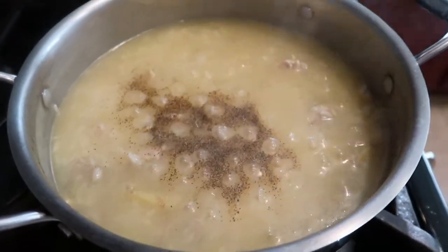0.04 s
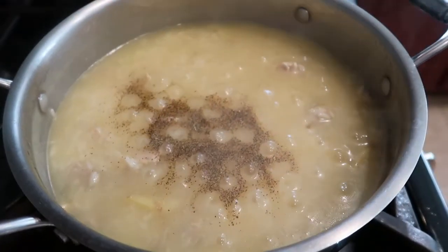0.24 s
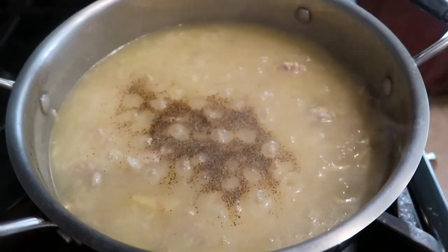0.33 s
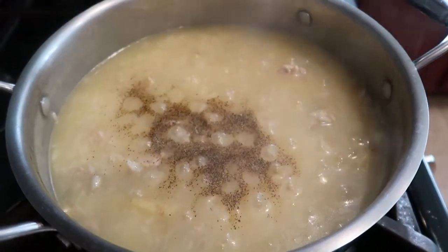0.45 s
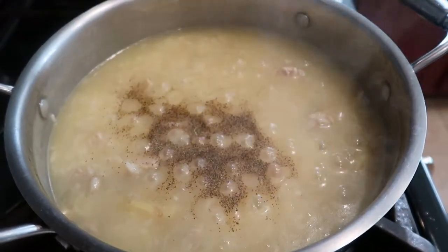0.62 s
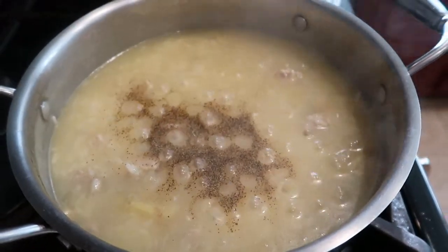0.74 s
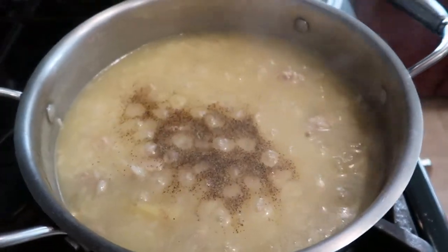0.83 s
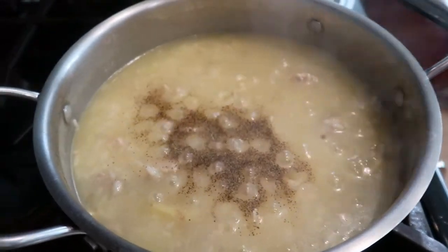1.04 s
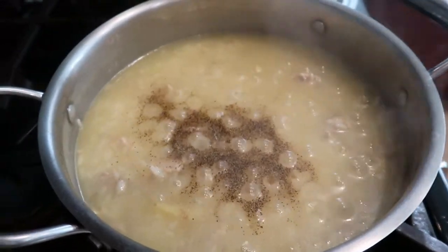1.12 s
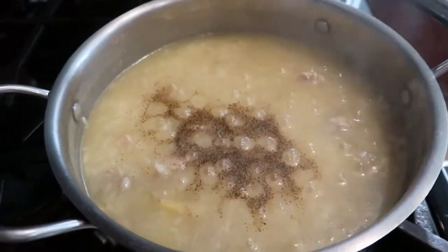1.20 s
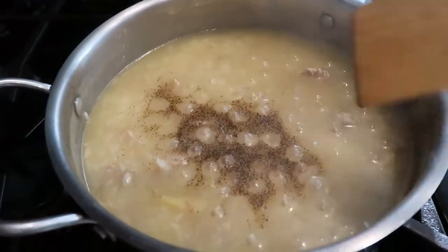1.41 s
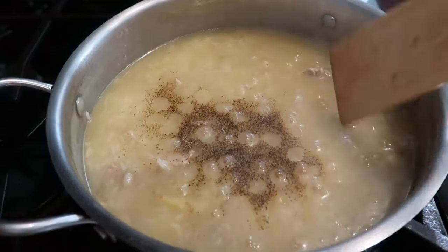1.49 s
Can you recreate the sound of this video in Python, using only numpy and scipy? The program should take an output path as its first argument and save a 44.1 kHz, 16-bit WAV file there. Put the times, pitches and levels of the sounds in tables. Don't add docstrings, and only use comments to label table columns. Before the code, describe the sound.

A very loud, dry wooden spatula knock on a counter at the right, then two quick weaker double-tap bounces, over faint fan drone, steam hiss and crackling porridge simmer; close stereo microphone in a live home kitchen.

```python
import sys
import numpy as np
from scipy import signal
from scipy.io import wavfile

SR = 44100
rng = np.random.default_rng(int(sys.argv[2]) if len(sys.argv) > 2 else 0)


def waveform_to_disk(signal):
    frames = np.transpose(np.atleast_2d(signal))
    scaled = np.clip(frames, -1, 1) * 32767
    samples = np.round(scaled).astype(np.int16)
    wavfile.write(sys.argv[1], SR, samples)


def undo_db(level):
    steps = np.asarray(level, float) / 20
    return 10 ** steps


N = 68355


def rms_one(x):
    return x / np.sqrt(np.mean(x ** 2) + 1e-20)


def at_hz(points, hz):
    table_hz, value = np.array(points).T
    return np.interp(np.log(hz), np.log(table_hz), value)


def filtered(x, order, hz, kind="low"):
    return signal.sosfilt(signal.butter(order, hz, kind, fs=SR, output="sos"), x)


def drift(rate_hz):
    r = np.exp(-80 * np.pi * rate_hz / SR)
    slow = signal.lfilter([1], [1, -2 * r, r * r], rng.standard_normal(N // 40 + 2002))[2000:]
    return np.interp(np.arange(N) / 40, np.arange(len(slow)), rms_one(slow))


def ring(clicks, hz, t60_s):
    r = undo_db(-60 / (t60_s * SR))
    w = 2 * np.pi * hz / SR
    return signal.lfilter([0, np.sin(w)], [1, -2 * r * np.cos(w), r * r], clicks + 1e-18)


def bands():
    edges = 22 * 2 ** np.arange(0, 9.6, 0.5)
    return [(np.sqrt(a * b), signal.butter(2, [a, b], "band", fs=SR, output="sos"))
            for a, b in zip(edges, edges[1:])]


def pair(mid, side, alike):
    alike = np.clip(alike, 0, 1)
    return np.sqrt(1 + alike) * mid + np.sqrt(1 - alike) * side * np.array([[1], [-1]])


# frequency in Hz, likeness 0 to 1.
LIKENESS = [(60, 0.98), (130, 1), (330, 0.53), (700, 0.88), (2000, 0.75), (4500, 0.48), (7000, 1),
            (14000, 1)]


def banded_noise(spectrum, patchy_db, flicker_hz):
    white = rng.standard_normal((2, 2, N))
    together = drift(3.7)
    out = 0
    for k, (hz, sos) in enumerate(bands()):
        level_db = at_hz(spectrum, hz) + patchy_db * (0.07 * together + drift(flicker_hz))
        out = out + undo_db(level_db) * pair(*signal.sosfilt(sos, white[k % 2]), at_hz(LIKENESS, hz))
    return rms_one(out)


# frequency in Hz, level in dB per Hz.
DRONE_SPECTRUM = [(15, -44), (25, -9.5), (123, 2.5), (167, -0.5), (220, -4), (437, -9), (493, -15),
                  (897, -8), (1500, -21), (1950, -24), (3300, -120)]


def drone():
    return undo_db(-45.5) * filtered(banded_noise(DRONE_SPECTRUM, patchy_db=-1.0, flicker_hz=2.1), 2, 1200)


# frequency in Hz, width in Hz, level in dB.
FAN_LINES = [(53.6, 3.6, -64.5), (124, 12, -57), (222.6, 18, -52.5), (254, 3.4, -64), (313.4, 48, -56),
             (670, 150, -57)]


def fan():
    out = np.zeros(N)
    for hz, width_hz, db in FAN_LINES:
        t60_s = 1.19 / width_hz
        noise = rng.standard_normal(N + SR)
        out += undo_db(db) * rms_one(ring(ring(noise, hz, t60_s), hz, t60_s)[SR:])
    blade_hz = 120.8 + 3.4 * drift(4.3)
    return out + undo_db(-47 + 1.5 * drift(15.0)) * np.sin(2 * np.pi * np.cumsum(blade_hz) / SR)


# frequency in Hz, level in dB per Hz.
HISS_SPECTRUM = [(710, -0.5), (1200, 0.5), (2050, 9), (2500, -10), (5400, -2), (8500, -13), (13300, -22),
                 (15500, -28)]


def hiss():
    return undo_db(-53) * filtered(banded_noise(HISS_SPECTRUM, patchy_db=2.8, flicker_hz=16), 2, 900, "high")


def grains(per_s, low_hz, high_hz, size_db, clump_db, cycles):
    tilt_db_per_octave, resonators = -3, 24
    sizes = undo_db(size_db * np.minimum(rng.exponential(1, N), 4)) * rng.choice([-1, 1], N)
    born = rng.random(N) < per_s * undo_db(clump_db * drift(25.0)) / SR
    dealt = rng.integers(0, resonators, N)
    lags = rng.integers(-2, 3, resonators)
    out = 0
    for k, hz in enumerate(np.geomspace(low_hz, high_hz, resonators)):
        t60_s = cycles / hz
        burst = 14 / t60_s / SR * ring(ring(sizes * born * (dealt == k), hz, t60_s), hz, t60_s)
        tilt = undo_db(tilt_db_per_octave * np.log2(hz / low_hz))
        out = out + tilt * np.array([burst, np.roll(burst, lags[k])])
    return rms_one(out)


def fizz():
    return undo_db(-56) * grains(per_s=1000, low_hz=2800, high_hz=9500, size_db=2.5, clump_db=4.5, cycles=15)


def simmer():
    return undo_db(-54.5) * grains(per_s=250, low_hz=446, high_hz=1660, size_db=2.5, clump_db=4.4, cycles=7.2)


def blips(rows, rise, partner_db):
    length, port_lag_s = 2000, 2e-5
    out = np.zeros((2, N + length))
    t = np.arange(length) / SR
    chances = rng.uniform(-0.46, 1, (len(rows), 2))
    for (start_s, db, hz, cycles), (ratio, place) in zip(rows, chances):
        u = t * hz * np.sqrt(2) * np.log(1000) / cycles
        swell = (u * np.exp(1 - u)) ** 2
        ear_t = t + port_lag_s * place * np.array([[1], [-1]])
        phase = 2 * np.pi * hz * ear_t * (1 + rise * t * hz / cycles)
        tone = np.sin(phase) + undo_db(partner_db) * np.sin((1 + 0.24 * ratio) * phase)
        i = int(start_s * SR)
        out[:, i:i + length] -= undo_db(db) * swell * tone
    return out[:, :N]


# start in seconds, peak in dB, pitch in Hz.
SNAPS = [(0.019, -42, 5000), (0.08, -40, 4260), (0.101, -43, 3870), (0.14, -34.5, 4840),
         (0.4051, -34, 3370), (0.5233, -42.5, 3250), (0.5781, -33, 4550), (0.6463, -35.5, 3940),
         (0.6713, -37, 4200), (0.7116, -41, 3520), (0.7575, -49, 4000), (0.7785, -38.5, 3400),
         (0.8278, -37, 4540), (0.8619, -36.5, 4470), (0.9028, -41, 4500), (0.9164, -40.5, 8900),
         (0.9722, -37.5, 4220), (0.9947, -42, 6700), (1.07, -35, 5940), (1.116, -39.5, 4900),
         (1.1438, -34, 4860), (1.161, -40, 7850), (1.2252, -35.5, 5700), (1.3102, -36, 6140),
         (1.355, -39, 5130), (1.4214, -45, 5740), (1.4431, -45, 5550), (1.4508, -33.5, 5940),
         (1.4542, -36, 4550), (1.501, -35.5, 4100), (0.0908, -41, 8600), (0.3497, -58, 9500),
         (0.546, -35.5, 5560), (0.605, -38, 4170), (0.772, -38, 4640), (0.836, -49, 5000),
         (0.9343, -46, 4800), (0.949, -45, 4800), (0.9547, -38.5, 5200), (0.968, -42, 5000),
         (0.98, -40, 4050), (1.0129, -42, 3620), (1.027, -49, 4020), (1.036, -59, 3620),
         (1.0435, -56, 8400), (1.084, -60, 3800), (1.0923, -43, 9200), (1.096, -42, 5010),
         (1.199, -58, 8340), (1.2047, -45, 5450), (1.254, -45.5, 6800), (1.271, -48, 4520),
         (1.335, -57, 5350), (1.365, -46, 4250), (1.388, -53, 4520), (1.4003, -48, 10100),
         (1.4731, -48, 10500), (1.13, -42, 11500)]


def snaps():
    return blips([(*row, 9.1) for row in SNAPS], rise=0.08, partner_db=-0.2)


# frequency in Hz, t60 in seconds.
KITCHEN_T60 = [(150, 0.72), (600, 1), (1800, 0.64), (4000, 0.44), (9000, 0.38)]
# frequency in Hz, likeness 0 to 1.
KITCHEN_ALIKE = [(250, 1), (600, 0.96), (2000, 0.97), (3200, 0.42), (5000, 1)]


def kitchen(x, level_db, t60_share):
    onset_s, early_db, early_t60_s = 0.0027, 12, 0.07
    t = np.arange(SR // 2) / SR
    white = rng.standard_normal((2, 2, len(t)))
    tail = 0
    for k, (hz, sos) in enumerate(bands()):
        if hz > 90:
            decay = undo_db(-60 * t / (t60_share * at_hz(KITCHEN_T60, hz)))
            tail = tail + decay * pair(*signal.sosfilt(sos, white[k % 2]), at_hz(KITCHEN_ALIKE, hz))
    tail = tail * (1 - np.exp(-(t / onset_s) ** 2)) * (1 + undo_db(early_db - 60 * t / early_t60_s))
    tail = tail / np.sqrt(np.sum(tail ** 2) / 2)
    return undo_db(level_db) * signal.fftconvolve(x[None], tail, axes=1)[:, :N]


# start in seconds, peak in dB, contact cut-off (hardness) in Hz.
KNOCKS = [
    (0.2091, 1.5, 4600),
    (.327, -11, 3650),
    (0.3299, -10.5, 3330),
    (0.3565, -9, 3640),
    (0.3592, -12.5, 3370),
]
# frequency in Hz, level in dB, t60 in seconds.
WOOD = [(900, -22, 0.022), (1075, 0.5, 0.013), (1378, -10.5, 0.022), (5660, -20, 0.003), (1678, 3, 0.011),
        (1900, 5, 0.01), (2100, -20, 0.0022), (6430, -3.5, 0.0061), (2552, 2.5, 0.004), (2804, 7, 0.0047),
        (3100, -12.5, 0.011), (3750, 3, 0.006), (4260, -3, 0.0031)]
# frequency in Hz, level in dB, t60 in seconds.
COUNTER = [(109, -33, 0.057), (239, -34, 0.053), (601, -27, 0.079)]


def spatula():
    strike_spread_db, crack_db, crack_grows = 3, -8, 0.6
    out = np.zeros((3, N))
    spread = rng.standard_normal((len(KNOCKS), len(WOOD)))
    for (start_s, db, cut_hz), own in zip(KNOCKS, spread):
        click = np.zeros(SR // 5)
        click[:2] = 1 - start_s * SR % 1, start_s * SR % 1
        crack = undo_db(crack_db + crack_grows * db) * np.diff(filtered(click, 2, 2 * cut_hz), prepend=0)
        click = filtered(click, 4, cut_hz)
        thin = filtered(click, 2, 860, "high")
        hit = 0
        for (hz, mode_db, t60_s), o in zip(WOOD, own):
            hit = hit + undo_db(mode_db + strike_spread_db * o) * ring(ring(thin, hz, t60_s), hz, 0.0016)
        top = 0
        for hz, mode_db, t60_s in COUNTER:
            top = top + undo_db(mode_db) * 38 / t60_s / SR * ring(ring(click, hz, t60_s), hz, t60_s)
        thud = undo_db(-10) * ring(click, 420, 0.0087) + undo_db(-2) * thin
        i = int(start_s * SR)
        out[:, i:i + len(hit)] += undo_db(db) * np.array([crack - hit / np.abs(hit).max(), top, thud])
    return out


def knock():
    wood, top, thud = spatula()
    shaded = filtered(wood, 1, 5730)
    to_walls = filtered(wood + thud, 2, 4600)
    return np.array([shaded, wood]) + top + kitchen(to_walls, level_db=-7, t60_share=1)


def duck():
    drop_db, recover_s = -6, 0.3
    t = np.arange(N) / SR - KNOCKS[0][0]
    return undo_db(drop_db * np.exp(-np.maximum(t, 0) / recover_s) * (t > 0))


# start in seconds, peak in dB, pitch in Hz, length in cycles.
PLOPS = [(.61, -48, 1985, 25), (.637, -33.5, 862, 2.1), (.692, -30, 1300, 13.3), (.732, -43, 516, 4.8),
         (.789, -35.5, 577, 3.2), (.8625, -39, 2920, 17), (.946, -35.5, 940, 6.7), (.968, -44, 1380, 13),
         (1.133, -42, 1220, 22), (1.144, -45, 870, 8.1), (1.179, -40.5, 860, 7.9), (1.2195, -44, 3200, 9.8),
         (1.246, -34, 1110, 7.9), (1.285, -34.5, 690, 2.1), (1.297, -36, 1890, 16), (1.356, -49, 865, 22),
         (1.406, -41, 3630, 8.6), (1.426, -43, 1090, 3.7), (1.435, -38, 820, 4.3), (1.438, -39, 1940, 9.8),
         (1.442, -34.5, 2630, 9), (1.445, -35, 2840, 5.2), (1.454, -42, 2000, 10), (1.457, -45, 3160, 6.1),
         (1.480, -49, 805, 4.4), (1.514, -51, 4340, 11), (1.523, -35, 3800, 5.3), (1.541, -44, 4370, 13)]


def plops():
    return blips(PLOPS, rise=0.083, partner_db=-5.5)


def scene():
    pot = fizz() + simmer() + snaps() + plops()
    pot = pot + kitchen(pot.mean(0), level_db=-6.5, t60_share=0.04)
    steady = drone() + fan() + hiss()
    return knock() + duck() * (pot + steady)


def low_pass(x):
    return signal.sosfilt(signal.butter(12, 16330, fs=SR, output="sos"), x)


def record(dry):
    overload, cutoff_hz = 0.97, 16000
    squashed = dry / (1 + (dry / overload) ** 6) ** (1 / 6)
    mix = signal.sosfilt(signal.cheby2(10, 60, cutoff_hz, fs=SR, output="sos"), squashed)
    return low_pass(mix)


dry = scene()
out = record(dry)
waveform_to_disk(out)
```